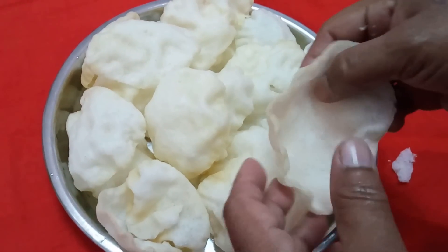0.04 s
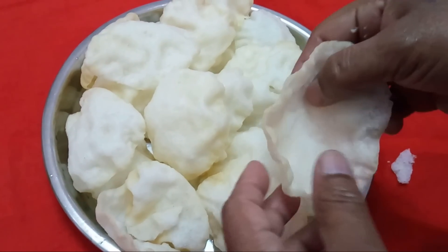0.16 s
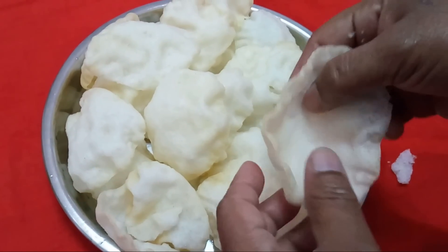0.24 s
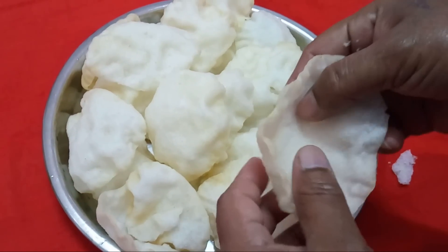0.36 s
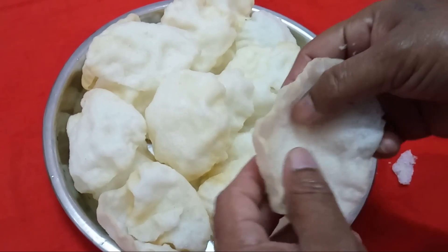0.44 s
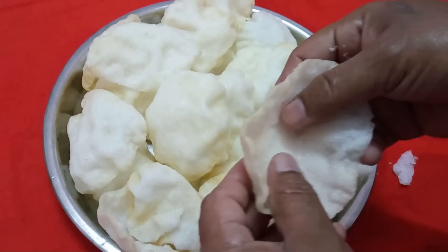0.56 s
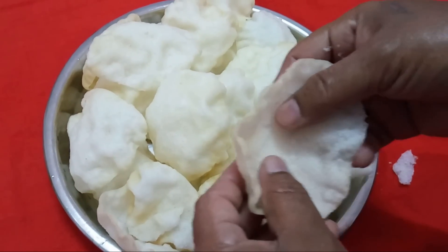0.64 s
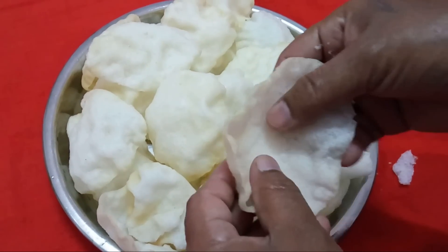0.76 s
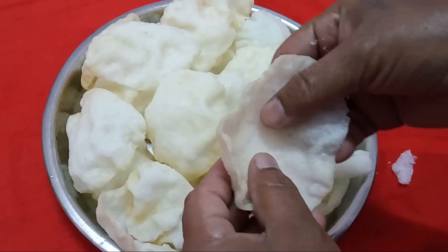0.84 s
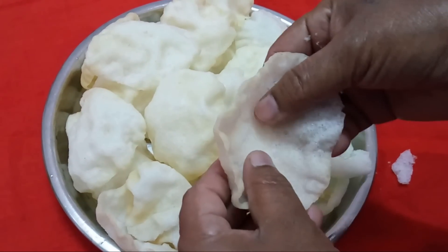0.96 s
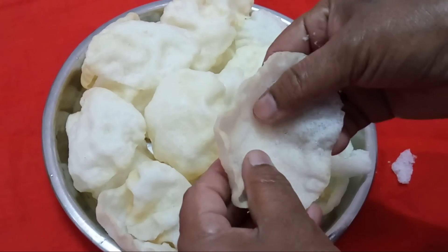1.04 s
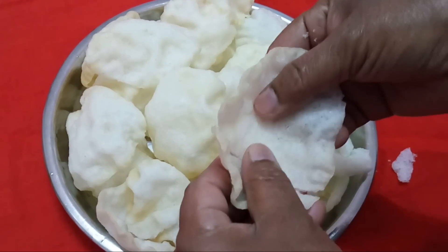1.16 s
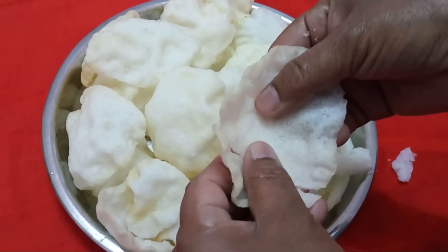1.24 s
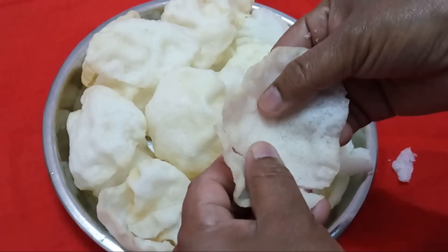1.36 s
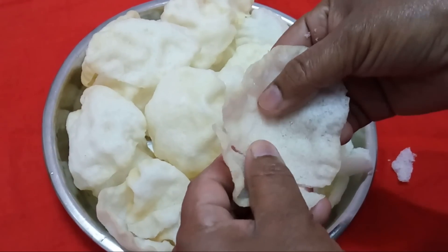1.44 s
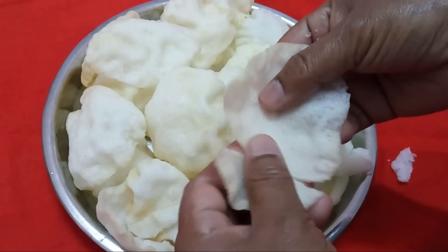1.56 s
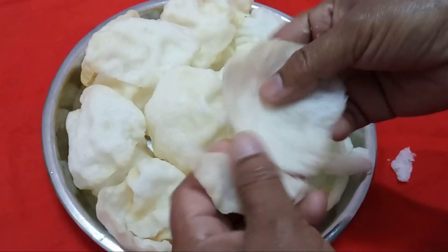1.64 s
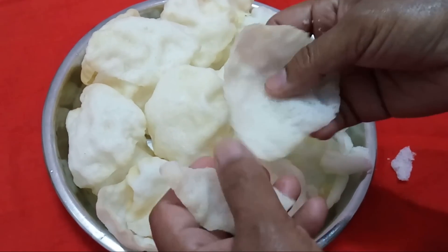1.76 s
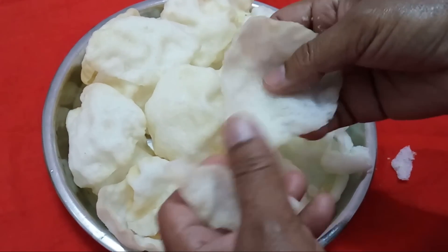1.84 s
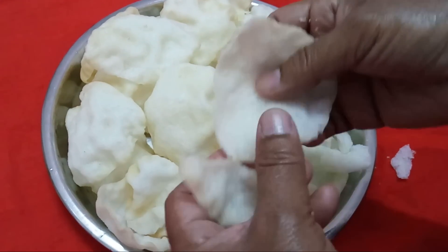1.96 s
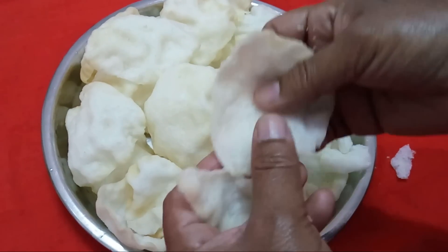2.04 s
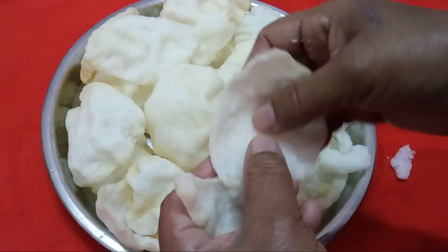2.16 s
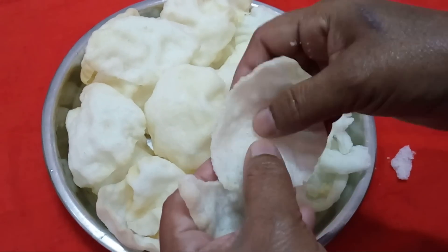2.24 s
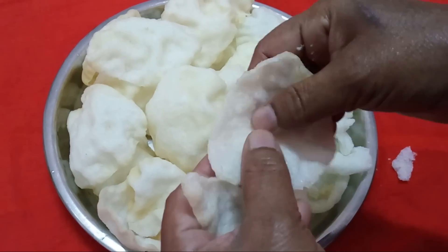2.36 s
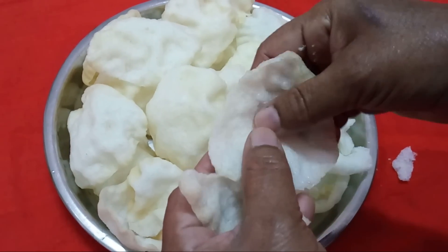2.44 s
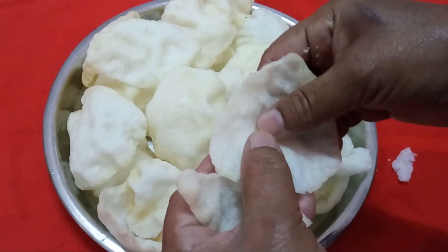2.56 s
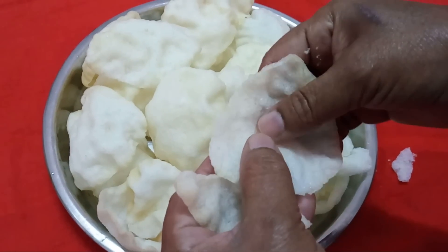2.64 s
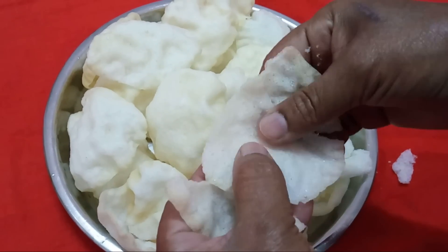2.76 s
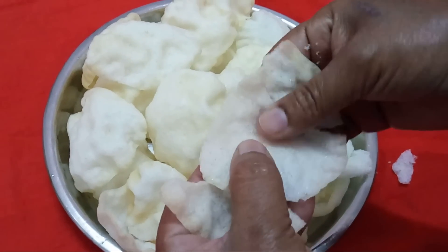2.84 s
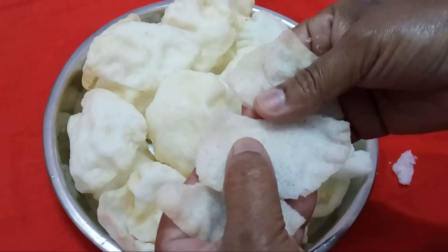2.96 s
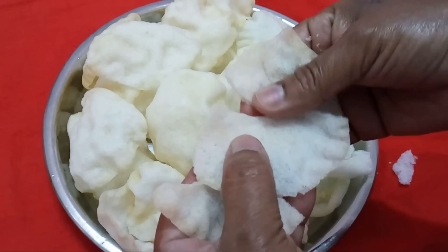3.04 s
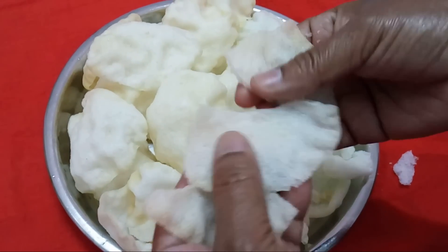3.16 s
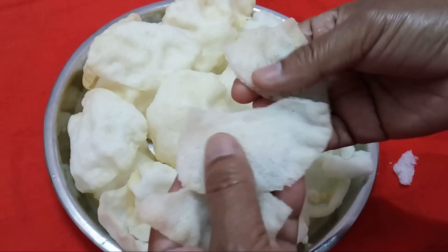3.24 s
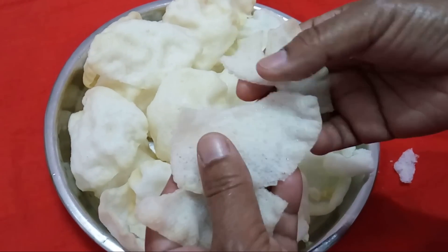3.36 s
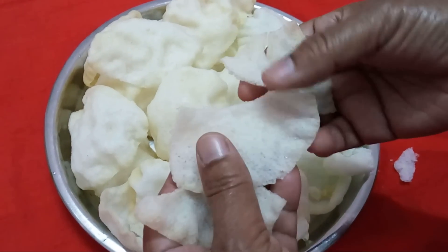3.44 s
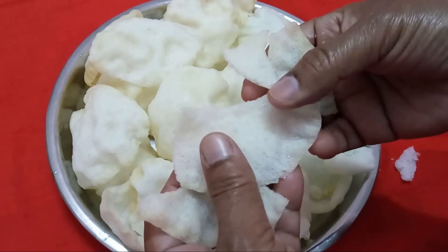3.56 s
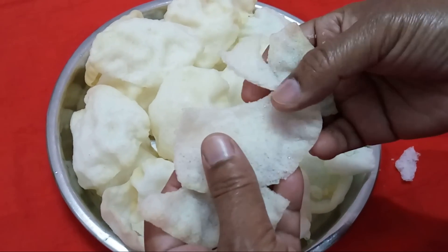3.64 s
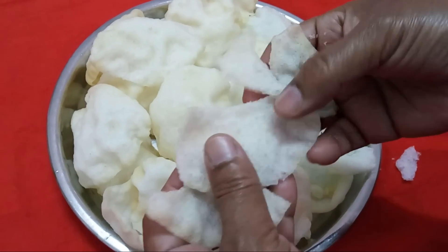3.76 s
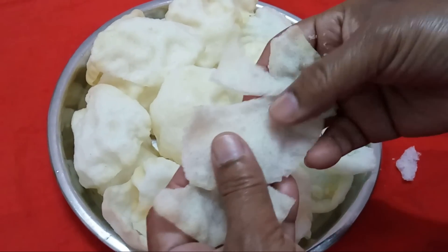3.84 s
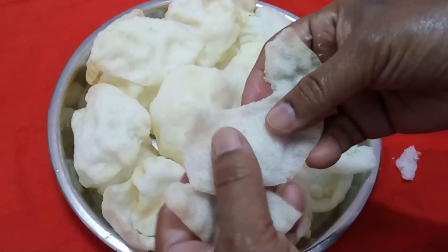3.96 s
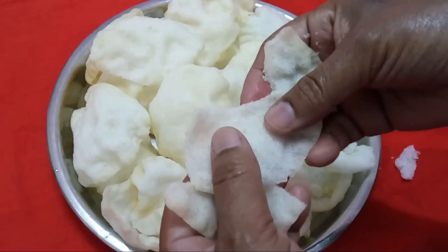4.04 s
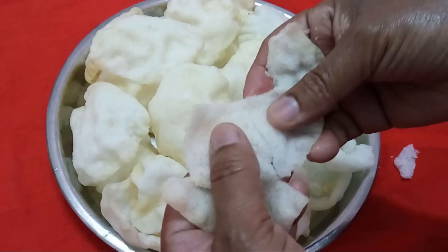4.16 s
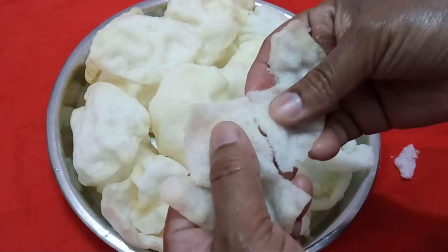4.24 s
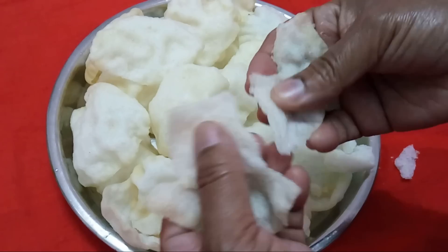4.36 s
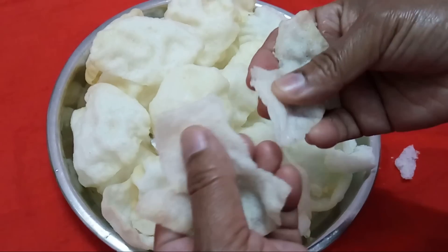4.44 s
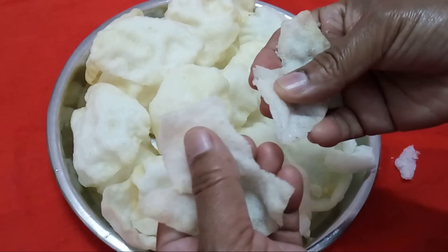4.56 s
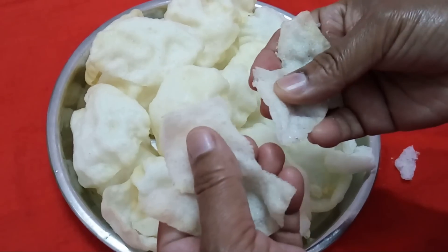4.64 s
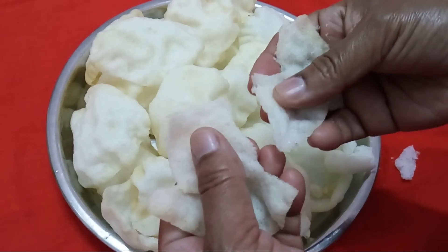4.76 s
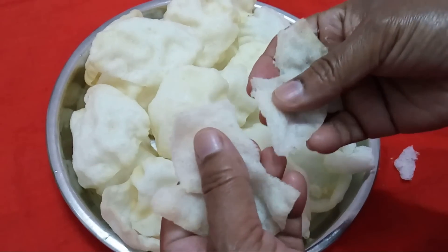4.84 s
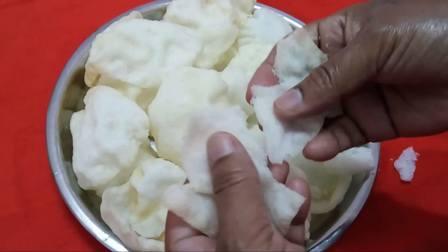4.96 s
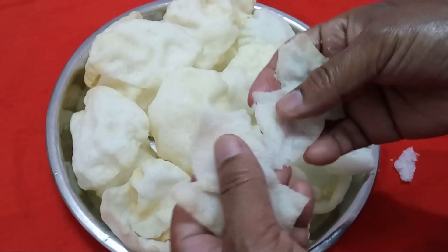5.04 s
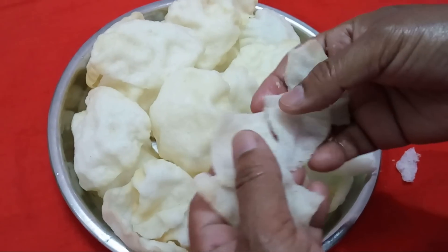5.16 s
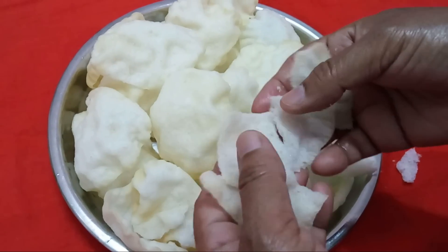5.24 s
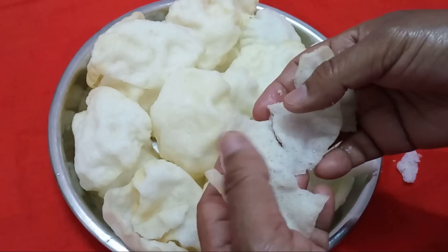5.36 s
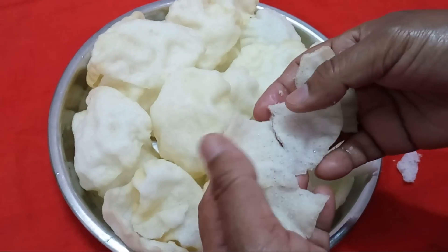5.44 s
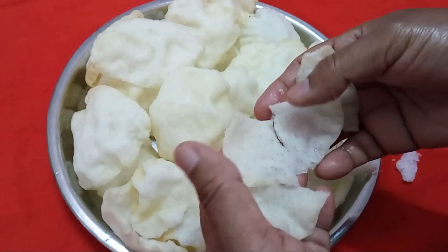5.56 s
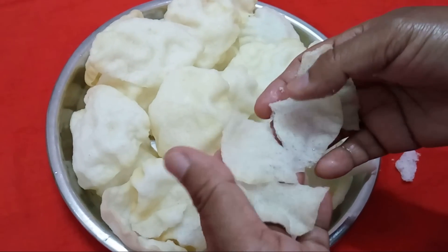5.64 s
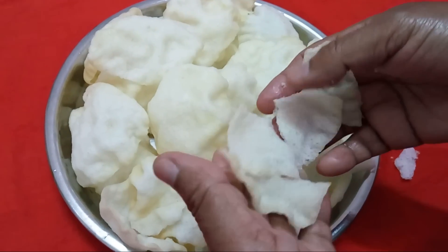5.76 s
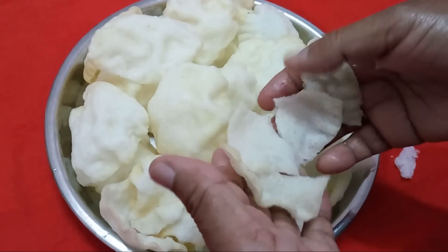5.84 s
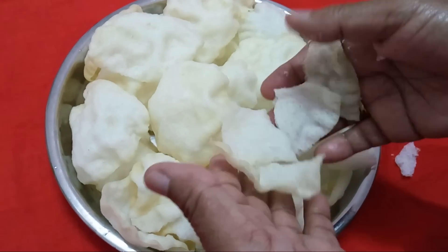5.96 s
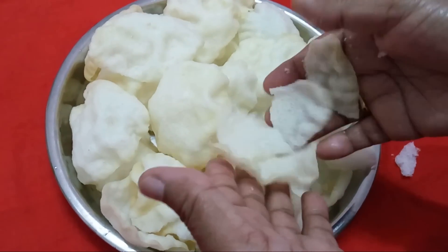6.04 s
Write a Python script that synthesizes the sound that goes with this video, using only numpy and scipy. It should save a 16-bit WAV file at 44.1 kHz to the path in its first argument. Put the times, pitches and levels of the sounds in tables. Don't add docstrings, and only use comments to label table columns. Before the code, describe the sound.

A phone close above a steel plate in a small hard kitchen picks up hands breaking a puffed fried cracker, slightly to the left. From 0 s a low, slow engine drones outside with thin hiss, while fingers rustle softly on the crust. Ticks thicken from about 1 s and two sharp snaps come at 1.2 s, the second very loud with a small air thump. Brittle crackling continues to 1.8 s. A faint distant horn blurs by at 2-2.5 s amid dense little ticks. The strongest breaks crack at 2.8-3.0 s, with a boomy puff on the left. Crackles run from 3.5 to 4.4 s, with sharp snaps at 4.2-4.45 s, hollow knocks and a crumb briefly ringing the plate. Background dips momentarily after big snaps. From 4.6 s only sparse ticks, faint snaps at 5.25 and 5.7 s, weak rustle and the gradually lower engine remain until about 6 s.

```python
import sys
import numpy as np
from scipy import signal
from scipy.fft import rfft, irfft
from scipy.io import wavfile
from scipy.ndimage import uniform_filter1d

SR = 44100
rng = np.random.default_rng(int(sys.argv[2]) if len(sys.argv) > 2 else 0)


def pcm_store(signal):
    levels = np.round(np.clip(np.atleast_2d(signal), -1, 1) * 32767)
    wavfile.write(sys.argv[1], SR, levels.astype(np.int16).T)


def magnitude_from_level(level_db):
    exponent = np.asarray(level_db, float) / 20
    return 10 ** exponent


N = 269186
TIME = np.arange(N) / SR
LAG_SAMPLES = 19

# start_s, firing_hz, order4_db, order5_db, order6_db, order7_db, growl_db
ENGINES = [(0.0, 22.6, -39, -40, -41, -52, -45), (0.49, 20.8, -36, -52, -51, -52, -48),
           (0.9, 19.4, -38, -52, -39, -48, -48), (1.18, 18.6, -50, -51, -51, -52, -50),
           (1.24, 18.5, -49, -47, -44, -47, -39), (1.5, 18.3, -50, -35, -41, -42, -44),
           (1.65, 18.2, -52, -40, -52, -45, -49), (2.07, 18.7, -45, -40, -28, -45, -41),
           (2.31, 19.0, -50, -52, -28, -37, -41), (2.44, 19.1, -52, -41, -30, -41, -48),
           (2.58, 19.3, -43, -37, -21, -39, -40), (2.73, 19.3, -49, -47, -26, -47, -40),
           (2.83, 19.3, -39, -35, -36, -38, -34), (2.92, 19.3, -48, -51, -41, -48, -45),
           (3.14, 19.4, -40, -43, -23, -47, -40), (3.45, 19.2, -38, -34, -23, -32, -34),
           (3.69, 19.0, -37, -47, -28, -47, -38), (3.83, 18.9, -36, -50, -26, -34, -37),
           (4.05, 18.6, -46, -28, -31, -45, -35), (4.28, 18.3, -52, -48, -44, -52, -46),
           (4.42, 18.1, -46, -30, -37, -42, -40), (4.58, 17.9, -52, -28, -35, -48, -38),
           (4.68, 17.8, -52, -28, -45, -37, -41), (4.98, 17.4, -52, -26, -44, -29, -44),
           (5.16, 17.3, -52, -38, -38, -41, -48), (5.32, 17.2, -52, -32, -43, -37, -49),
           (5.68, 16.9, -52, -44, -45, -52, -51), (5.92, 16.8, -52, -38, -49, -39, -45),
           (6.1, 16.7, -52, -43, -42, -44, -48)]
# centre_hz, width_hz, level_db
GROWL = [
    (217, 16.5, -0.5),
    (267, 150, 3.5),
    (288, 90, 0.5),
    (390, 180, -7.5),
]
# freq_hz, level_db
HISS = [(240, -25.5), (400, 1), (460, -3), (1070, 1.5), (1530, -4), (8060, -58), (10200, -32.5),
        (13500, -7), (15000, -17), (16500, -1)]
# start_s, body_db, blister_db, crackle_db, top_db
RUSTLE = [(0.0, -47.5, -40.5, -43, -41), (0.1, -53, -42, -51, -45), (0.15, -45, -33, -45, -35.5),
          (0.27, -49, -51.5, -55.5, -49), (0.33, -50, -42, -40, -50.5), (0.45, -48, -44.5, -53, -41.5),
          (0.64, -44, -38, -42.5, -38.5), (0.71, -48, -50, -55, -56), (0.75, -43.5, -41.5, -44, -49),
          (0.79, -53, -50, -62, -48.5), (1.05, -58.5, -43, -50, -45.5), (1.17, -56, -40.5, -53, -37.5),
          (1.22, -71, -56, -74, -43), (1.27, -45, -36, -37, -35), (1.34, -37.5, -36, -34.5, -39),
          (1.53, -55, -56, -58.5, -52.5), (1.6, -56, -37, -57, -34.5), (1.68, -43, -36, -38.5, -30.5),
          (1.85, -51.5, -51, -45, -45), (2.03, -48, -45, -51.5, -48.5), (2.16, -53, -40.5, -38, -41.5),
          (2.24, -41.5, -31, -36, -30.5), (2.37, -59, -47, -50, -54), (2.47, -45, -38, -29, -27.5),
          (2.54, -49, -46, -45, -49), (2.63, -52.5, -46.5, -59, -48), (2.77, -63, -46.5, -56, -51),
          (2.82, -68, -41, -31, -38), (2.86, -52.5, -48, -41, -47.5), (3.11, -45.5, -39, -38.5, -35),
          (3.21, -46, -46, -40.5, -46), (3.3, -47, -38.5, -33.5, -37), (3.36, -50, -50, -56, -55),
          (3.399, -49.5, -72, -29, -71), (3.55, -51.5, -56, -56.5, -43), (3.65, -45.5, -43, -39.5, -41),
          (3.71, -53, -48.5, -65, -58), (3.98, -48, -46, -36, -44), (4.09, -49, -49, -46, -42),
          (4.14, -44.5, -39, -36, -35), (4.18, -37, -46, -45, -59), (4.26, -55.5, -52, -42, -41),
          (4.42, -39, -44, -35, -37.5), (4.46, -38, -34, -37, -38.5), (4.64, -54, -63, -62, -67),
          (4.74, -59.5, -77, -62.5, -67), (4.95, -60, -78, -58.5, -66), (5.0, -53.5, -74, -50.5, -59),
          (5.15, -62, -74, -65, -80), (5.2, -60, -51, -55.5, -42.5), (5.27, -54.5, -52, -42.5, -49),
          (5.41, -60, -59, -55, -58), (5.47, -60, -58, -55, -52), (5.57, -64, -77, -61, -95),
          (5.67, -59, -81, -61, -72), (5.71, -63.5, -63, -57, -62), (5.75, -53, -56, -49, -53),
          (5.88, -64.5, -78, -67, -65.5), (6.0, -57, -60, -52.5, -50), (6.1, -58, -57, -55, -49)]
# freq_hz, density_db
CRUST = [(290, -36), (500, -6), (885, -9), (966, -8), (1570, -8), (2190, -11), (3250, -3), (4110, -6),
         (4830, -3), (6470, -5), (7820, -11), (10000, 0), (13400, -12), (15100, -4), (16500, -23)]
EDGES_HZ = (380, 2500, 4200, 7500, 15800)
# start_s, peak_db, top_rel_db
TICKS = [(0.016, -34, -14), (0.224, -38.5, 14), (0.8402, -32.5, -23), (0.9897, -35, -5),
         (1.0102, -28, -4.5), (1.1113, -33.5, 0), (1.1448, -34, 2), (1.1645, -36, 15), (1.1911, -30, 13.5),
         (1.4822, -43, -3), (1.532, -31, -1.5), (1.5538, -42, 6), (1.5652, -48, 7), (1.5793, -33, 12),
         (1.584, -24.5, 2), (1.611, -26.5, 5.5), (1.6404, -32, 16), (1.7022, -22, -1.5), (1.7314, -32, -5),
         (1.743, -31, -13), (1.7674, -23.5, 1.5), (2.1475, -29.5, 12.5), (2.1598, -24.5, 9),
         (2.3089, -29.5, -2), (2.327, -27, 7), (2.3338, -35, 4), (2.3503, -26.5, 8), (2.3834, -26.5, 3),
         (2.4071, -25.5, 6.5), (2.4181, -31, 9), (2.428, -39, 5), (2.479, -27.5, 8), (2.5024, -27, 8),
         (2.6757, -42, 17), (2.684, -36.5, 6), (2.692, -28.5, 2.5), (2.7174, -48, -13), (2.7338, -29.5, 7),
         (2.7446, -31.5, -2), (2.7639, -37, 13), (2.7695, -34.5, 14), (2.787, -29.5, -3),
         (2.7972, -28.5, 7), (2.8272, -20.5, 3), (2.9996, -28.5, 1), (3.004, -36, 16), (3.239, -34.5, 8),
         (3.3662, -44, 17), (3.4, -59, 29), (3.4762, -35.5, 1), (3.5126, -36.5, 6), (3.5376, -46, -2),
         (3.561, -50, 11), (3.5909, -39.5, 7.5), (3.5996, -32, 5), (3.6307, -28.5, 11), (3.6485, -16, -1.5),
         (3.6633, -34, 8), (3.686, -24.5, 1.5), (3.7494, -24.5, -1), (3.755, -33, -5), (3.7886, -20, 3),
         (3.8094, -45, 11), (3.8523, -29, 1), (3.8988, -20.5, -0.5), (4.02, -35, 11.5), (4.0337, -37, 7),
         (4.1029, -25, -2), (4.1307, -38, 8), (4.1449, -22.5, 4), (4.1622, -27, -13), (4.1811, -22.5, 4),
         (4.2158, -29, 5), (4.2305, -38, 13), (4.2494, -36, 15), (4.2679, -38, 12), (4.2884, -29, 4),
         (4.3816, -28, 9.5), (4.4104, -25.5, -7), (4.8982, -44, 4), (4.9192, -51, 10.5), (4.987, -46, 5),
         (5.0064, -37, 8), (5.194, -43, 16), (5.29, -39, 11), (5.3572, -34, 8), (5.4442, -44.5, 14.5),
         (5.5942, -49.5, 1), (5.6842, -42, -4), (5.7039, -39.5, 16), (6.008, -42, 14.5), (6.0146, -45, 6)]
# start_s, peak_db, body_rel_db, top_rel_db, left_minus_right_db, burst_ms
SNAPS = [(0.141, -28, -16, -5, 10.5, 5.9), (1.1807, -12, -31, -4, 7, 2.3), (1.2481, -4.5, -19, -3, 1, 5.5),
         (2.4542, -32, -40, 1, 22.5, 9), (2.8128, -4.5, -16.5, -5, 0.5, 4.1),
         (2.8569, -12, -35, 6.5, 4, 1.6), (2.939, -14.5, -39, -3, 4, 8.6), (2.9427, -22, -38, -21, 17, 3.5),
         (3.033, -4.5, -20.5, -1, 3.5, 3.4), (3.87, -19, -38, 2.5, 7.5, 5.5),
         (4.2409, -10, -20.5, 1.5, 6, 1.6), (4.2964, -12, -16.5, 4.5, 3, 4.5),
         (4.442, -14, -47, -13, 5, 7.1), (5.248, -38, -21.5, 6, 18.5, 7), (5.6917, -38.5, -26, 7, 11, 5.4),
         (5.7093, -46, -22, 6, 23, 7)]
# start_s, peak_db, pitch_hz
PUFFS = [
    (1.252, -16.5, 104),
    (2.814, -8, 105),
    (3.034, -48, 100),
    (4.297, -24, 105),
]
# start_s, level_db
HORN = [
    (1.98, -56),
    (2.1, -39),
    (2.152, -51),
    (2.25, -36),
    (2.398, -52),
    (2.618, -53),
    (2.66, -69),
]
# multiple, level_db
HORN_ORDERS = [
    (8, 0),
    (9, -2),
    (10, -7),
]
# start_s, peak_db, pitch_hz
KNOCKS = [
    (4.162, -26, 1540),
    (4.18, -20.5, 1610),
    (4.454, -27.5, 806),
]
# pitch_hz, level_db, t60_s
PLATE = [(1513, -14, 0.24), (1949, -25, 2.5), (2143, -10, 0.42), (2363, -19, 0.36), (2955, -25, 0.93),
         (3252, -16, 0.66), (3634, -9, 0.42), (3720, -13, 0.3), (3962, 0, 0.3), (4226, -7, 0.34),
         (4344, -11, 0.28), (4463, -18, 0.33), (4678, -15, 0.38), (4888, -7, 0.2), (5486, -16, 0.42),
         (5895, -6, 0.24), (6331, -15, 0.43)]
# start_s, level_db
PLATE_HITS = [
    (4.441, -27.5),
    (4.482, -34),
    (4.545, -44),
]


def rms(x):
    return np.sqrt(np.mean(x ** 2))


def curves(table):
    s, *columns = np.transpose(table)
    return [np.interp(TIME, s, c) for c in columns]


def band(x, lo_hz, hi_hz, order=2):
    return signal.sosfilt(signal.butter(order, [lo_hz, hi_hz], "bandpass", fs=SR, output="sos"), x)


def colour(x, table, size=1024):
    hz, db = np.transpose(table)
    log_hz = np.log(np.fft.rfftfreq(size, 1 / SR) + 1)
    log_gain = np.interp(log_hz, np.log(hz), db) * np.log(10) / 20
    cep = irfft(log_gain)
    cep = np.r_[cep[0], 2 * cep[1:size // 2], np.zeros(size // 2)]
    impulse = irfft(np.exp(rfft(cep)))
    return signal.fftconvolve(x, impulse[None], axes=1)[:, :N]


def walk(rate_hz):
    hold = int(SR / rate_hz)
    steps = np.repeat(rng.standard_normal(N // hold + 1), hold)
    return 1.84 * uniform_filter1d(uniform_filter1d(steps, hold), hold)[:N]


def ring(start_s, hz, t60_s):
    t = np.clip(TIME - start_s, 0, None)
    return np.sin(2 * np.pi * hz * t) * np.exp(-np.log(1000) * t / t60_s)


def ports(pair, alike):
    late = np.roll(pair[0], LAG_SAMPLES, axis=-1)
    return np.array([pair[0], alike * late + np.sqrt(1 - alike ** 2) * pair[1]])


def pan(left_minus_right_db):
    return magnitude_from_level(np.array([[left_minus_right_db], [-left_minus_right_db]]) / 2)


def drone(turns, order_db, blur=0.33):
    levels = order_db + [order_db[-1] - 9.5]
    total = 0
    for order, db in enumerate(levels, 4):
        waver = 1 + blur * (walk(14) + 1j * walk(13))
        total = total + magnitude_from_level(db + 0.02) * np.sqrt(2) * (np.exp(2j * np.pi * order * turns) * waver).real
    return total


def exhaust_growl(turns, jitter_turns=0.008, breath=0.55, street_s=0.05):
    pulses = np.diff(np.floor(turns + jitter_turns * walk(15)), prepend=0)
    echo_s = np.arange(SR // 4) / SR
    echoes = rng.standard_normal(SR // 4) * np.exp(-echo_s / street_s)
    smeared = signal.fftconvolve(pulses, echoes)[:N]
    noise = rng.standard_normal((2, N))
    noise[0] = breath * noise[0] + smeared / rms(smeared)
    growl = sum(magnitude_from_level(db) * band(noise, hz - width / 2, hz + width / 2, order=1) for hz, width, db in GROWL)
    mid, side = band(growl + 0.4 * noise, 150, 405, order=5)
    return np.array([mid + 0.4 * side, mid - 0.4 * side])


def engines():
    hz, *order_db, growl_db = curves(ENGINES)
    turns = np.cumsum(hz) / SR
    tones = band(drone(turns, order_db), 67, 173, order=3) * magnitude_from_level(np.array([[0.6], [-0.6]]))
    growl = exhaust_growl(turns)
    deep = band(rng.standard_normal(N), 26, 36, order=3)
    boom = band(rng.standard_normal((2, N)), 75, 141.5, order=3)
    mid, side = boom / rms(boom) * magnitude_from_level(np.max(order_db, axis=0) - 9.5)
    boom = np.array([mid + 0.13 * side, mid - 0.25 * side])
    return tones + boom + magnitude_from_level(growl_db) * (growl / rms(growl) + magnitude_from_level(-13) * deep / rms(deep))


def hiss(level_db=-54.5):
    noise = colour(rng.standard_normal((2, N)), HISS)
    return noise / rms(noise) * magnitude_from_level(level_db)


def crust(buses):
    unit = colour(rng.standard_normal((1, N)), CRUST)
    total = 0
    for k, (x, lo_hz, hi_hz) in enumerate(zip(buses, EDGES_HZ, EDGES_HZ[1:])):
        region = band(colour(x, CRUST), lo_hz, hi_hz) / rms(band(unit, lo_hz, hi_hz))
        total = total + (-1) ** k * region
    return total


def rustle(per_s=2300, size_db=3.2, smear_ms=1.2, flicker_db=1.3, pan_db=4.0):
    sizes = magnitude_from_level(size_db * np.minimum(rng.exponential(size=N), 4))
    grains = (rng.random(N) < per_s / SR) * sizes
    puffs = signal.lfilter([1], [1, -np.exp(-1000 / smear_ms / SR)], grains)
    stream = puffs / rms(puffs) * magnitude_from_level(flicker_db * walk(70))
    noise = ports(stream * rng.standard_normal((2, N)), 0.1) * pan(pan_db)
    return crust([noise * magnitude_from_level(db - 2.0 + walk(40)) for db in curves(RUSTLE)])


def fractures(rows, rise_ms, spread_db):
    size = 1024
    ms = np.arange(size) / SR * 1000
    uneven = magnitude_from_level(spread_db * rng.standard_normal((len(rows), 1, size)))
    cracks = rng.standard_normal((len(rows), 2, size)) * uneven
    blister_db = 3 * rng.standard_normal(len(rows))
    buzz = magnitude_from_level(-20) * np.exp(-ms / 4)
    buses = np.zeros((4, 2, N + size))
    for (s, db, body, top, pan_db, length_ms), crack, lean in zip(rows, cracks, blister_db):
        shape = np.clip(ms / rise_ms, 0, 1) * (np.exp(-(ms / length_ms) ** 3) + buzz)
        burst = ports(crack * shape / rms(crack), 0.13) * pan(pan_db)
        region_db = db + np.array([body, lean - 3.0, -lean - 3.0, top])
        i = int(s * SR)
        buses[:, :, i:i + size] += magnitude_from_level(region_db)[:, None, None] * burst
    return crust(buses[:, :, :N])


def ticks():
    rows = []
    for s, db, top in TICKS:
        pan_db = 6 + 2 * rng.standard_normal()
        tear_ms = 2.2 * magnitude_from_level(0.12 * (db + 25))
        rows.append((s, db - 0.5, -13.0, top + 0.12, pan_db, tear_ms))
    return fractures(rows, rise_ms=0.6, spread_db=4)


def snaps():
    rows = [(s, db - 11.0, body + 15.6, top + 4.0, 1.3 * pan_db, ms) for s, db, body, top, pan_db, ms in SNAPS]
    return fractures(rows, rise_ms=0.8, spread_db=4)


def air_puffs():
    thumps = sum(magnitude_from_level(db + 6.0) * ring(s, hz, 0.027) for s, db, hz in PUFFS)
    return band(thumps, 93, 900) * np.array([[1.6], [0.4]])


def horn(pitch_hz=340):
    on = (TIME > HORN[0][0]) & (TIME < HORN[-1][0])
    level = uniform_filter1d(on * magnitude_from_level(curves(HORN)[0] - 3), size=900)
    turns = np.cumsum(pitch_hz * (1 + 0.008 * walk(30))) / SR
    pair = np.zeros((2, N))
    for port in pair:
        for order, db in HORN_ORDERS:
            echoes = (walk(60) + 1j * walk(60) + 0.9) * magnitude_from_level(2.5 * walk(20))
            port += magnitude_from_level(db) * (echoes * np.exp(2j * np.pi * order * turns)).real
    return level * pair


def hollow_knocks():
    hollow = sum(magnitude_from_level(db) * ring(s, hz, 0.026) * (1 + 0.5 * walk(300)) for s, db, hz in KNOCKS)
    return np.array([1.25 * hollow, 0.5 * np.roll(hollow, LAG_SAMPLES)])


def plate(rattle=0.25, max_t60_s=0.3):
    strikes = magnitude_from_level(2 * rng.standard_normal((len(PLATE_HITS), 2, len(PLATE))))
    total = np.zeros((2, N))
    for (s, hit_db), gains in zip(PLATE_HITS, strikes):
        for k, (hz, db, t60_s) in enumerate(PLATE):
            mode = ring(s, hz, min(t60_s, max_t60_s)) * (1 + rattle * walk(90))
            total += magnitude_from_level(hit_db + db) * gains[:, k, None] * mode
    return total


def kitchen(x, t60_s=0.4, wet_db=-20):
    t = np.arange(SR // 2) / SR
    tail = rng.standard_normal((2, len(t))) * np.exp(-np.log(1000) * t / t60_s) * (t > 0.004)
    tail = tail / np.sqrt(np.sum(tail[0] ** 2))
    return x + magnitude_from_level(wet_db) * signal.fftconvolve(x, tail, axes=1)[:, :N]


def ducking(depth_db, release_s):
    push = 0
    for s, db, _, _, _, ms in SNAPS:
        release = np.exp(-np.clip(TIME - s, 0, None) / release_s)
        push = push + magnitude_from_level(db + depth_db) * (TIME > s + ms / 1000) * release
    return 1 / (1 + uniform_filter1d(push, size=88))


def scene():
    far = (engines() + horn() + hiss()) * ducking(depth_db=34.0, release_s=0.01)
    near = (rustle() + kitchen(ticks() + snaps())) * ducking(depth_db=2.0, release_s=0.0068)
    return far + near + kitchen(air_puffs() + hollow_knocks() + plate())


def band_limit(x):
    return signal.sosfilt(signal.butter(12, 16800, fs=SR, output="sos"), x)


def record(dry):
    heard = band(dry, 25, 15900, order=5)
    mix = np.tanh(1.528 * heard) / 1.624
    return band_limit(mix)


dry = scene()
out = record(dry)
pcm_store(out)
```